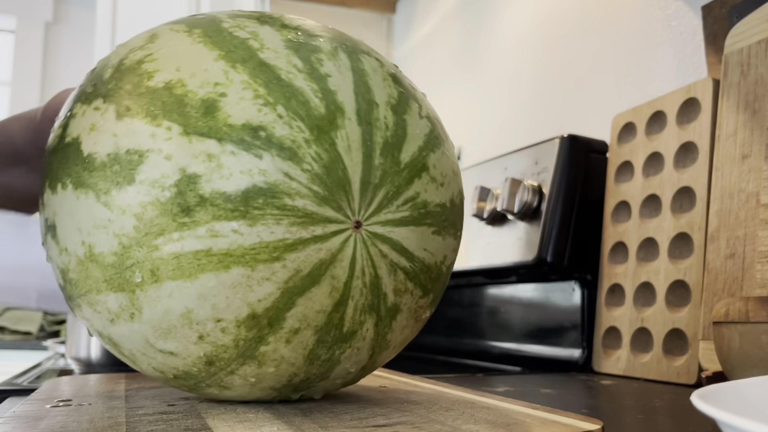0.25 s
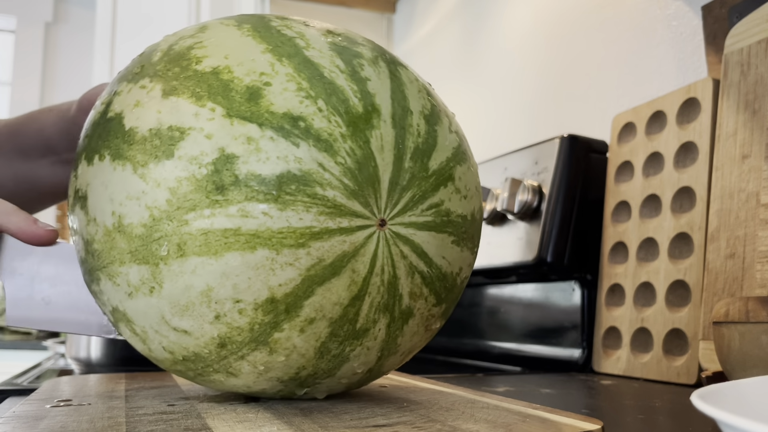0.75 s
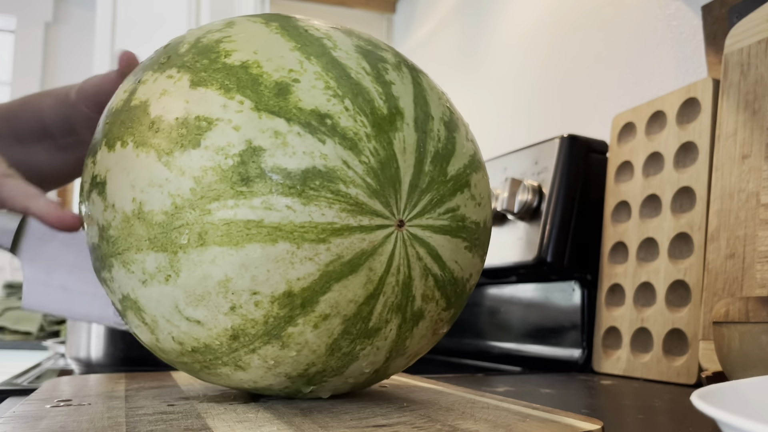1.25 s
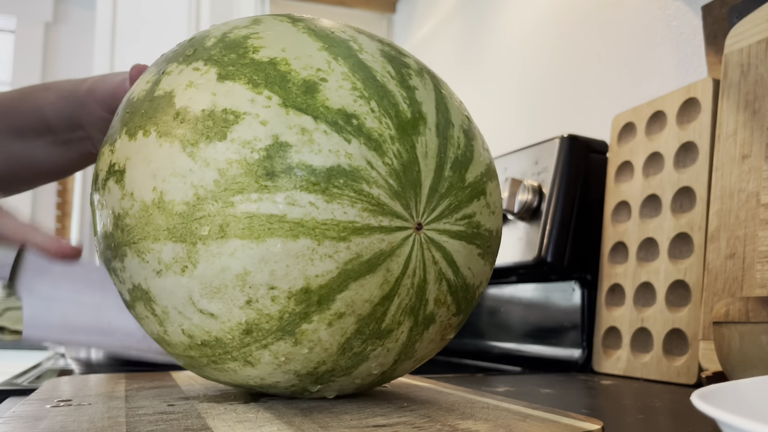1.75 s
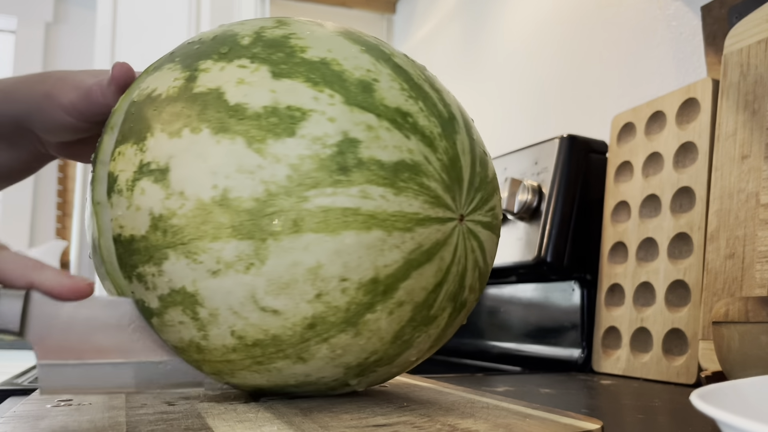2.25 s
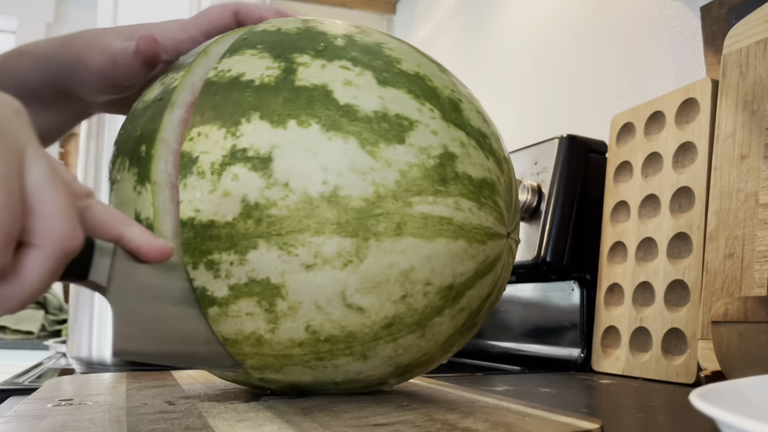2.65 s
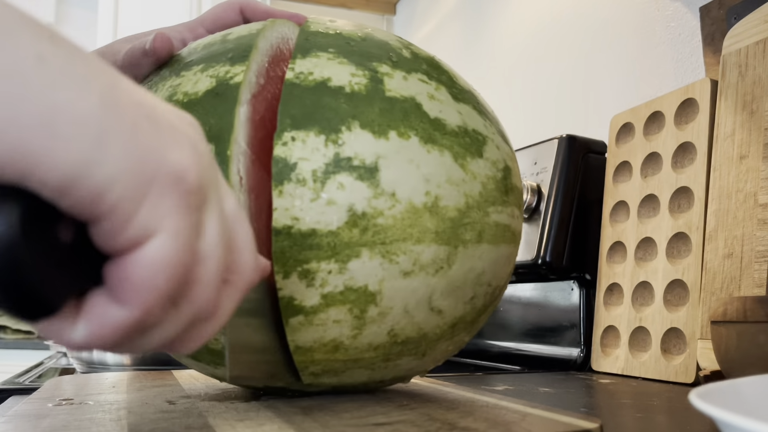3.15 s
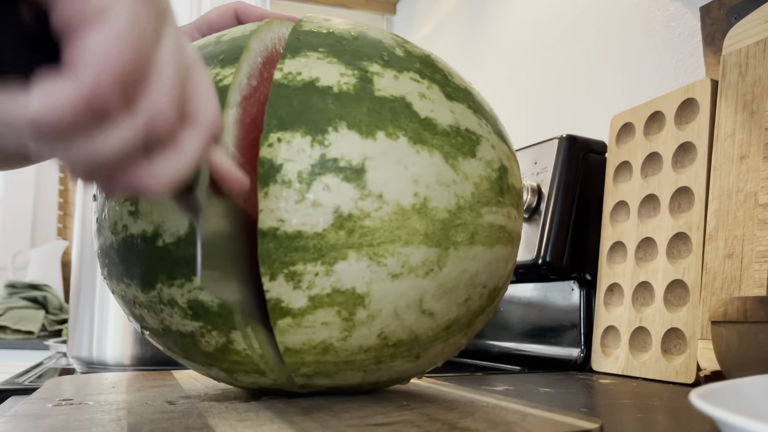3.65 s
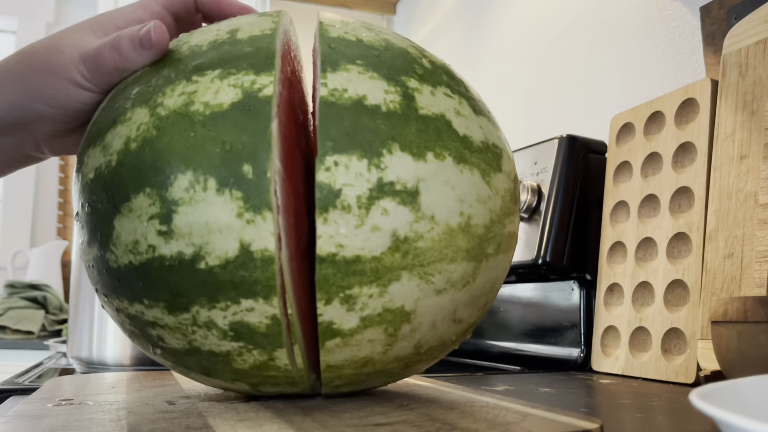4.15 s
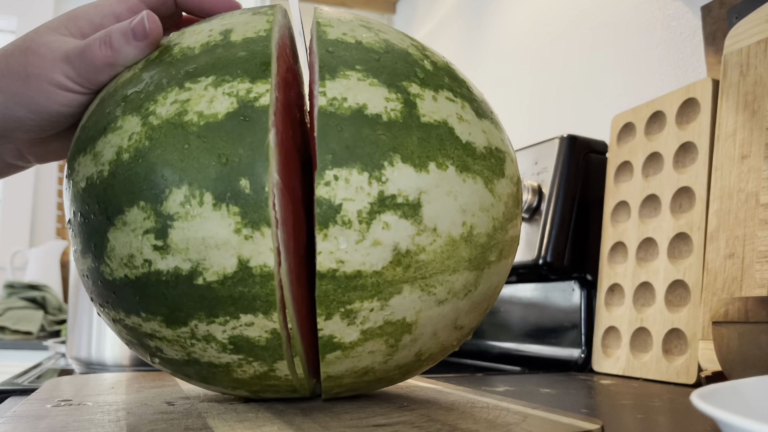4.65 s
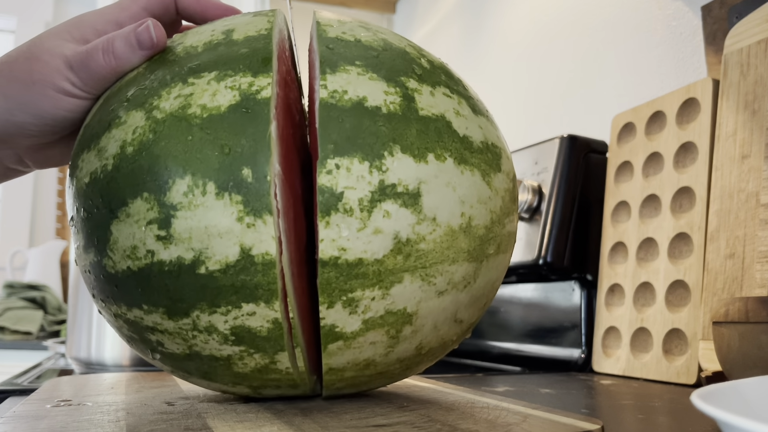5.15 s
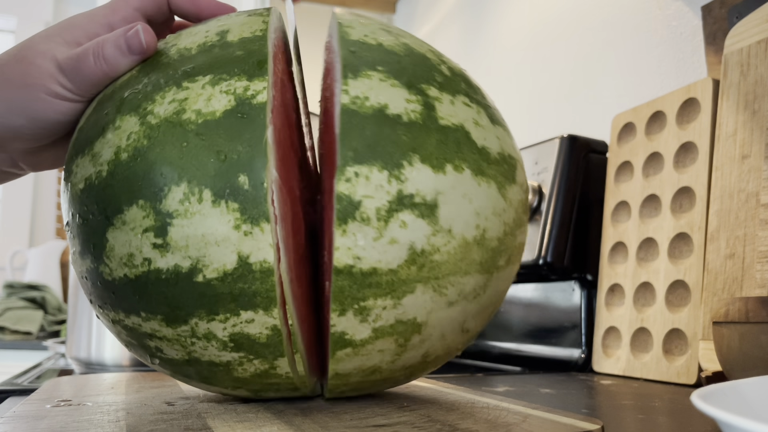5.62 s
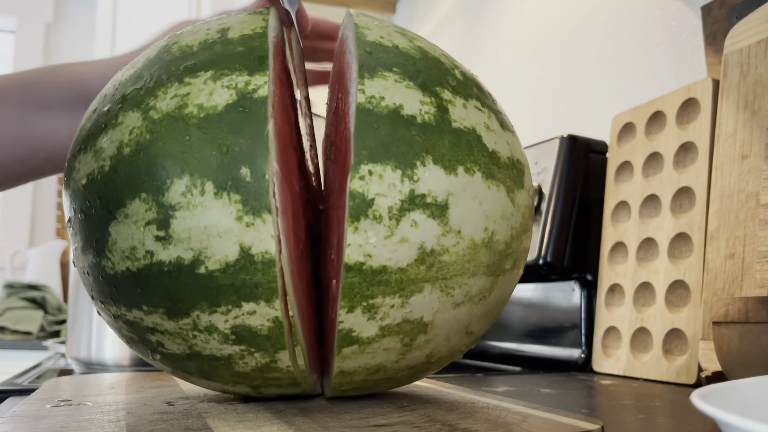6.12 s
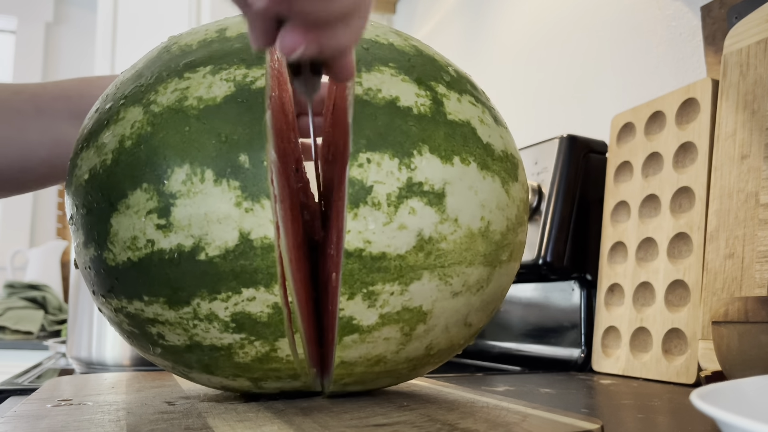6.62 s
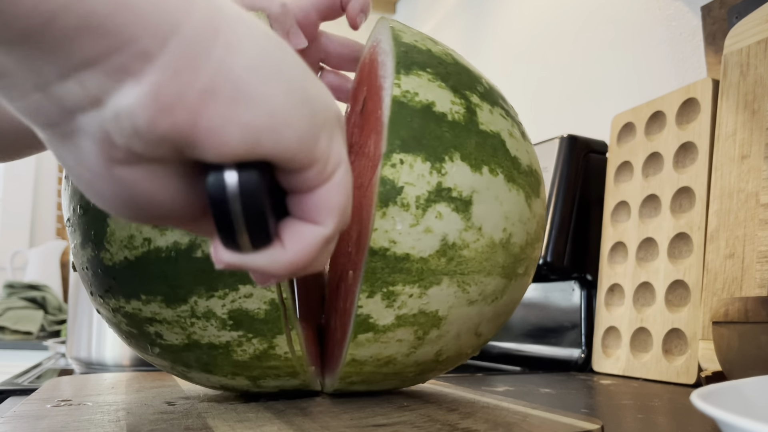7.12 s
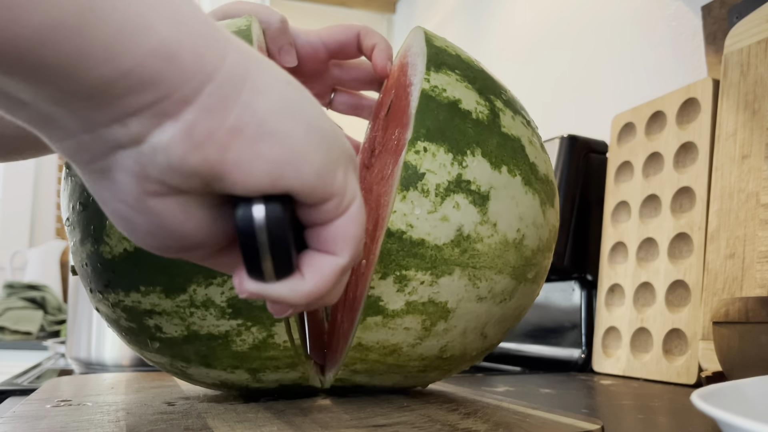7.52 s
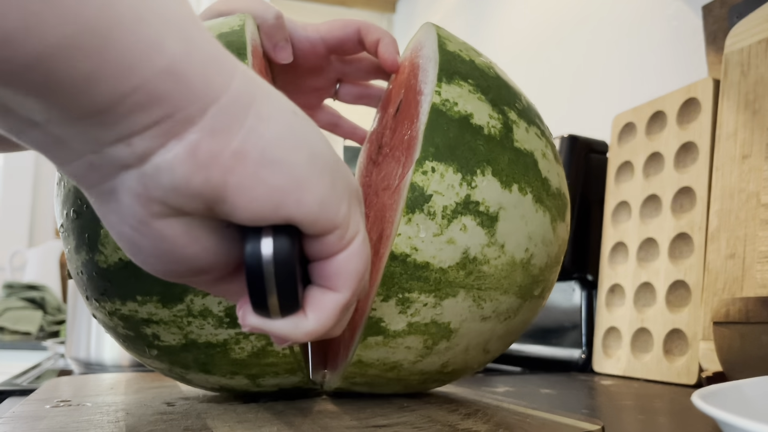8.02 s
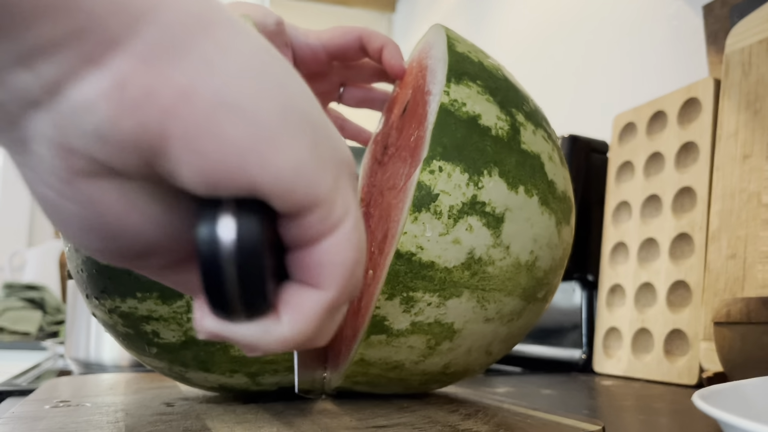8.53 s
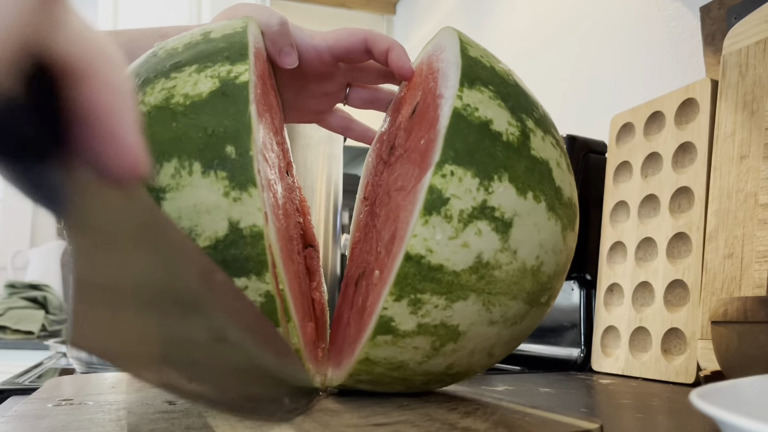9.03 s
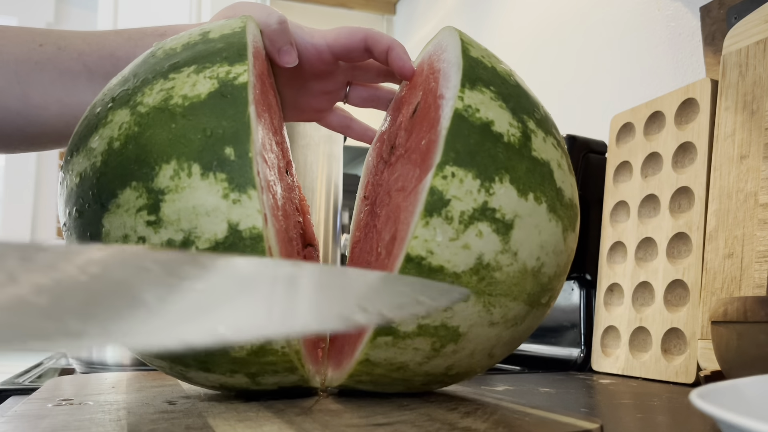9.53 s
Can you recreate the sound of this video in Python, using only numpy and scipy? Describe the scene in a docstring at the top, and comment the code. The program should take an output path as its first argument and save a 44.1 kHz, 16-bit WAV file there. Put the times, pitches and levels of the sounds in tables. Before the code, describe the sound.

Close up in a small kitchen, a big knife cuts a watermelon. A rapid cluster of sharp rind cracks and hollow booms opens it, with more loud cracks after a short lull. Quieter wet slicing, snaps and crackling tears follow, then one very hard knock on the wooden board, a rough squealing drag of the edge, and faint steel wipes over a low appliance hum.

```python
"""In a small kitchen, close to the microphone, a large knife splits a watermelon on a wooden board.
Fracture of the taut rind sends out sharp reports and sets shell and melon booming.
Random bursts of cells make the tearing flesh crackle and hiss along the blade; stick-slip makes it sing.
The edge strikes the board's modes and is drawn out over it in a rough squeal. An appliance hums behind."""
import sys
import numpy as np
from scipy import signal
from scipy.fft import rfft, irfft
from scipy.io import wavfile
from scipy.ndimage import uniform_filter1d, map_coordinates

SR = 44100
rng = np.random.default_rng(int(sys.argv[2]) if len(sys.argv) > 2 else 0)


def output_pcm(signal):
    """Save a mono or channel-first signal as 16-bit PCM at the path in sys.argv[1].

    Samples are clipped to [-1, 1] before scaling.
    """
    pcm = np.clip(np.atleast_2d(signal).T, -1, 1) * 32767
    wavfile.write(sys.argv[1], SR, np.round(pcm).astype(np.int16))


N = 431298
T = np.arange(N) / SR
FREQS = np.arange(N // 2 + 1) * SR / N
# Levels in the tables are in decibels; some of the functions that play them add gains of their own.


def undb(db):
    """Decibels to amplitude gain."""
    return 10 ** (np.asarray(db) / 20)


def unit(x):
    """Scale to rms 1."""
    return x / np.sqrt(np.mean(x ** 2))


def peak(x):
    """Scale to peak 1."""
    return x / np.abs(x).max()


def unit_energy(x):
    """Scale to a sum of squares of 1."""
    return x / np.sqrt(np.sum(x ** 2))


def add(track, s, sound):
    """Superposition: mix a sound in at time s."""
    i = max(int(s * SR), 0)
    track[i:i + len(sound)] += sound[:N - i]


def along(points, hz=FREQS, axis=1):
    """Interpolate a column of a table on a log-frequency axis."""
    rows = np.array(points, float)
    return np.interp(np.log(hz + 1), np.log(rows[:, 0]), rows[:, axis])


def response(points, size=1024):
    """Minimum phase: the causal impulse response of a spectrum, found by folding its cepstrum."""
    hz = np.arange(size // 2 + 1) * SR / size
    cepstrum = irfft(np.log(undb(along(points, hz))))
    cepstrum[1:size // 2] *= 2
    cepstrum[size // 2 + 1:] = 0
    return unit_energy(irfft(np.exp(rfft(cepstrum))))


def through(x, h):
    """Convolution: pass a sound through an impulse response."""
    return signal.fftconvolve(x, h)[:len(x)]


def smooth_noise(width, size=N):
    """Random fluctuation averaged over a width in samples, rms 1."""
    return unit(uniform_filter1d(rng.standard_normal(size), size=width))


def wander(seconds, size=N):
    """Random drift: noise averaged twice over the given time, rms 1."""
    width = int(seconds * SR)
    return unit(uniform_filter1d(smooth_noise(width, size), size=width))


def ring(modes, detune=0., size=32768):
    """Modal superposition: damped sines of alternating sign, with an optional random spread of pitch."""
    t, out = T[:size], 0
    for k, (hz, db, t60) in enumerate(modes):
        pitch = hz * (1 + detune * rng.standard_normal())
        out = out + (-1) ** k * undb(db - 60 * t / t60) * np.sin(2 * np.pi * pitch * t)
    return out


def push(seconds):
    """Contact force: a raised-cosine pulse, duller the longer it lasts."""
    return np.sin(np.pi * np.minimum(T[:SR // 20] / seconds, 1)) ** 2


def grains(rate, spread_db, size=N):
    """Random point process of bursting cells: many small clicks and a few large ones, rms 1."""
    sizes = undb(spread_db * np.minimum(rng.exponential(size=size), 5))
    return unit((rng.random(size) < rate / SR) * sizes * rng.standard_normal(size))


def fracture(run_s, crumble_db, crumble_s, lead_s=0.0011, lead_db=-14, size=2048):
    """Brittle fracture: first fibres give, a crack runs through the cells and crumbles on; unit energy."""
    t = T[:size] - lead_s
    after = np.maximum(t, 0)
    running = np.exp(-after / run_s) + undb(crumble_db) * np.exp(-after / crumble_s)
    force = np.where(t < 0, undb(lead_db), running)
    burst = grains(30000, 3.2, size=size) * force
    return np.pad(unit_energy(burst), (0, size))


# cracks of the rind: start_s, level_db, hollowness_db (middle band over treble), flap pitch_hz, run_s
CRACKS = [(0.069, -21.5, 4.5, 3000, 0.0005), (0.076, -26.5, 8.5, 990, .005), (0.081, -24, -2, 3120, 0.0018),
          (0.1014, -22, 1, 3330, 0.00078), (0.1383, -21.5, 0.5, 3020, 0.001),
          (0.1445, -17, -8, 4330, 0.0014), (0.149, -22, 1, 4200, .0006), (0.173, -17, -4, 3240, .0009),
          (0.1995, -21.5, -3, 4120, .0012), (0.2296, -22, -5.5, 4200, 0.00075),
          (1.4976, -13.5, -3, 1097, 0.00044), (1.5456, -19.5, 1, 5160, 0.00053),
          (1.551, -18, 2, 3000, 0.00033), (1.5571, -20.5, -8, 5200, 0.00056),
          (2.005, -42.5, 9, 1090, .0012), (5.18, -34.5, -3, 1892, 0.0021), (5.2134, -30.5, 5, 1270, .001),
          (5.218, -28, -0.5, 2000, 0.0035), (5.278, -32.5, -4, 2500, 0.0014), (5.491, -41, 5.5, 1700, .003),
          (5.523, -38, 3.5, 1200, .002), (5.535, -43.5, 6, 1000, .002), (5.546, -45, 6, 1400, .002),
          (5.595, -35, -1.5, 9000, 0.0024), (6.753, -33, 2.5, 1600, .0008), (6.797, -34, 4.5, 1400, 0.001),
          (6.929, -29, 4.5, 1580, 0.002), (6.9892, -33, 4.5, 2100, .001), (7.001, -39.5, 5, 2000, 0.0025),
          (7.049, -35.5, -3, 6360, 0.0011), (7.076, -29, -7, 8260, 0.00091), (7.083, -34.5, 2, 6000, .0012),
          (7.116, -29, -3, 5000, 0.0035), (7.1688, -26.5, -1, 4900, 0.00046)]
# small wet snaps of fibres: start_s, level_db
SNAPS = [(0.511, -33), (0.627, -21.5), (0.6928, -22.5), (1.084, -33), (1.461, -37), (1.523, -14.5),
         (1.9362, -15), (2.098, -30), (2.2363, -43.5), (2.382, -47), (2.542, -36), (2.566, -44.5),
         (2.6555, -41), (3.1994, -44.5), (3.592, -37), (3.6784, -26), (4.144, -47.5), (4.265, -44.5),
         (4.28, -45), (4.9427, -50.5), (5.03, -35), (5.121, -42.5), (5.447, -25.5), (5.466, -23),
         (7.366, -23.5), (7.583, -33.5), (8.335, -38.5), (9.38, -49.5), (9.64, -54.5)]
# middle and treble spectra of a crack: frequency_hz, level_db
CRACK_MID = [(200, -13.5), (400, -15), (900, -5.5), (1600, -8), (2500, -4.5), (4000, -22.5), (8000, -43.5)]
CRACK_TOP = [(1200, -35), (2500, -4.5), (3800, -4.5), (5400, -5), (6800, -7), (8500, -3), (11500, -4),
             (14000, -20.5)]
# modes of the whole melon: frequency_hz, level_db, t60_s
MELON_MODES = [(57.84, -13.5, 0.51), (71, -12, 0.34), (88, -5.5, .22), (108, -1, 0.15), (126.3, 8.5, 0.096),
               (132.6, 3.5, 0.16), (182, 0, 0.1), (280, -1.5, 0.039), (306, -1.5, 0.093),
               (395.5, -6.5, 0.17), (613, -10.5, 0.048)]


def rind(mid_db=22, top_db=25, boom_db=-10, snap_db=7, flap_db=8):
    """Impulsive excitation: a crack sounds through its freed flap and kicks the melon; fibres only tick."""
    out, mid, top = np.zeros(N), response(CRACK_MID), response(CRACK_TOP)
    for s, db, hollow_db, hz, run in CRACKS:
        burst = fracture(run_s=run, crumble_db=-15, crumble_s=.005)
        colour = undb(hollow_db + mid_db) * mid + undb(top_db) * top
        flap_peak = response([(hz / 1.5, 0), (hz, flap_db), (hz * 1.5, 0)])
        report = unit(through(burst, through(colour, flap_peak)))
        # the level follows the colour's energy, whatever the flap
        add(out, s, undb(db) * report * np.sqrt(np.sum(colour ** 2) / len(burst)))
        add(out, s, undb(db + boom_db) * peak(ring(MELON_MODES, detune=0.035)))
    for s, db in SNAPS:
        burst = fracture(run_s=.0008, crumble_db=-15, crumble_s=.006)
        add(out, s, undb(db + snap_db) * through(burst, top + 0.18 * mid))
    return out


# blows to the shell: start_s, level_db, first_pitch_hz, settled_pitch_hz, swell_s, melon ring level_db
THUDS = [(0.0695, -20, 2000, 235, 0.0089, -30.5), (0.101, -26.5, 1190, 175, 0.0089, -29),
         (0.1387, -18, 700, 195, 0.01, -31), (0.175, -30.5, 1294, 141, 0.0039, -26),
         (1.4989, -17, 1507, 164, 0.0057, -22.5), (1.546, -27.5, 1410, 151.3, 0.011, -35),
         (2.0056, -21.5, 1608, 98.5, 0.013, -30.5), (2.022, -27.5, 299.5, 115.4, 0.0067, -28),
         (3.29, -23, 695.5, 108.7, 0.019, -27.5), (4.656, -45, 893, 220, 0.0063, -57),
         (5.2133, -23, 1494, 214, 0.0045, -37), (5.491, -40, 1530, 334, 0.0045, -44),
         (5.521, -32.5, 1650, 336, 0.0073, -38), (5.544, -34.5, 1290, 232, 0.0029, -41),
         (5.594, -42, 1180, 108, 0.011, -40.5), (6.7524, -37, 1710, 79, 0.0033, -36),
         (6.7972, -37, 1840, 84, 0.0051, -32.5), (6.9306, -34.5, 1560, 102, 0.0014, -33.5),
         (6.99, -40, 1470, 100, 0.0034, -32.5), (7.086, -43, 1470, 124, 0.0044, -37),
         (7.117, -40, 1760, 107, 0.012, -41), (7.759, -45, 880, 99, 0.0088, -40),
         (8.022, -28.5, 1200, 134, 0.0083, -29.5)]
SWEEP_S, BOOM_T60_S = 0.0026, 0.32


def booming(contact_s=.007, upper_db=-5, upper_ratio=2.7, upper_t60_s=0.038):
    """Dispersion: high bending waves arrive first, so a blow chirps down to a boom over the melon's ring."""
    out, t = np.zeros(N), T[:16384]
    for s, db, first_hz, settled_hz, swell, body_db in THUDS:
        hz = settled_hz + (first_hz - settled_hz) / (1 + t / SWEEP_S) ** 2
        phase = 2 * np.pi * np.cumsum(hz) / SR
        envelope = peak(t / (swell ** 2 + t ** 2) * undb(-60 * t / BOOM_T60_S))
        # a brief higher wave, roughened by random phase
        rough_phase = upper_ratio * phase + wander(0.0007, size=len(t))
        upper = undb(upper_db - 60 * t / upper_t60_s) * np.sin(rough_phase)
        add(out, s, undb(db) * envelope * (np.sin(phase) + upper))
        body = through(ring(MELON_MODES, detune=0.02), push(contact_s))
        add(out, s, undb(body_db) * peak(body))
    return out


# runs of tearing flesh: height_s (time of the maximum), level_db, fade_s, brightness_db
TEARS = [(0.079, -16.5, 0.0059, -2), (0.147, -21.5, 0.0086, 0.5), (.19, -35, 0.076, 5),
         (1.099, -42.5, 0.014, 2.5), (1.502, -27, 0.014, -1), (1.559, -33.5, 0.0084, -8),
         (1.955, -37, 0.033, -2.5), (2.029, -37, 0.0048, -9), (2.555, -58, 0.019, 6.5),
         (3.28, -50.5, 0.011, 3.5), (3.695, -49, 0.053, 5), (4.667, -44, 0.018, 14.5),
         (4.945, -44, 0.0086, 6.5), (5.229, -32, 0.042, 7.5), (5.494, -35, 0.034, 3),
         (5.527, -32, 0.033, 7.5), (5.562, -45, 0.015, 8), (5.595, -30, 0.01, 8), (6.69, -40.5, 0.068, 3.5),
         (7.02, -38, 0.082, 4.5), (7.127, -27, 0.012, -2), (7.386, -34, 0.035, -1.5),
         (7.756, -33, 0.023, -2), (8.798, -35, 0.011, 6.5)]
# middle and treble spectra of bursting flesh: frequency_hz, level_db
FLESH_MID = [(150, -25.5), (400, -3), (1100, -1), (2000, -1.5), (3200, -3), (5000, -11.5), (9000, -57.5)]
FLESH_TOP = [(1500, -37.5), (3500, -10.5), (5200, -3), (7000, -1), (8800, 5), (11400, 8.5), (12600, -14.5),
             (14000, -21)]
TEAR_SWELL = 0.61  # a tear builds up in this share of its fading time


def tearing(mid_db=-4, top_db=-2, body_db=-9, lumpy_db=1.5):
    """Crackling noise: the split widens in spurts of dense bursts that also shake the melon's modes."""
    mid_gain, top_gain = np.zeros(N), np.zeros(N)
    for s, db, fade, bright_db in TEARS:
        distance = np.maximum((s - T) / (TEAR_SWELL * fade), (T - s) / fade)
        spurt = np.exp(-np.minimum(distance, 20))
        mid_gain += spurt * undb(db - bright_db + mid_db)
        top_gain += spurt * undb(db + top_db)
    lumps = undb(lumpy_db * smooth_noise(300))
    cells = unit(grains(3200, 1.5) * lumps)
    shake = undb(body_db) * through(cells * mid_gain, unit_energy(ring(MELON_MODES)))
    flesh_mid = through(cells * mid_gain, response(FLESH_MID))
    flesh_top = through(cells * top_gain, response(FLESH_TOP))
    return flesh_mid + flesh_top + shake


STROKE_ATTACK_S, STROKE_RELEASE_S = .022, .02


def stroke(s, length, growth_db=0, release=STROKE_RELEASE_S):
    """Force envelope of a hand movement: a quick start, a hold that grows or eases, a release."""
    progress = np.clip((T - s) / length, 0, 1)
    outside = np.maximum((s - T) / STROKE_ATTACK_S, (T - s - length) / release)
    return undb(growth_db * (progress - .5)) * np.exp(-np.clip(outside, 0, 20))


def rubbed(pressure, modes, rate):
    """Friction excitation: random grains ring a set of modes, as loud as the pressure."""
    return unit(through(grains(rate, 0.64), ring(modes))) * pressure


# time in which the edge is drawn out over the board: start_s, end_s
DRAW_OUT_S = (8.22, 9.06)
GLIDE_PER_S = .35  # fall of the log pitch
STEEL_SHARE, BARE_SHARE = .4, .9  # coloured share of the fizz, before and at the end of the draw


def blade_colour(x, count=23):
    """Modal coloration: uneven, drifting resonances that grow clearer and glide down as the blade is drawn."""
    start, end = DRAW_OUT_S
    free = np.clip(T - start, 0, end - start) * (T < end)
    modes = [(1000 + 680 * (k + .6 * rng.random()), 0, .03) for k in range(count)]
    steel = unit(through(grains(3000, 1.5), ring(modes, size=4096)))
    pitch = np.exp(.025 * wander(.2) + .007 * wander(.025) - GLIDE_PER_S * free)
    # reading the ringing at a varying speed shifts its resonances
    shifted = map_coordinates(steel, [np.cumsum(pitch)], order=3, mode="mirror")
    share = STEEL_SHARE + (BARE_SHARE - STEEL_SHARE) * np.sqrt(free / (end - start))
    return np.sqrt(1 - share) * x + np.sqrt(share * .6) * shifted


# strokes through the flesh: start_s, length_s, level_db, growth_db, wetness_db (middle band over hiss)
STROKES = [(.005, 0.043, -63.5, -11, -5.5), (0.338, 0.66, -59.5, 10, 1), (1.134, 0.075, -65.5, -2.5, 4.5),
           (1.419, 0.079, -64, 25, 4.5), (2.125, 0.15, -69.5, -2.5, -7.5), (3.446, 0.3, -57.5, 8, -2),
           (4.674, 0.23, -58.5, 1, -12.5), (5.115, 0.47, -55, 25.5, -6), (5.781, 0.41, -59, -1.5, -7.5),
           (6.284, 0.25, -61.5, -4.5, -7.5), (6.629, 0.24, -53.5, -16.5, -6.5), (7.24, 0.2, -58, -3, 0),
           (7.616, 0.16, -54.5, 26, -3), (8.283, 0.72, -58.5, 3, -2.5)]
# the bare blade wipes along the rind: start_s, length_s, level_db, growth_db
WIPES = [(3.883, 0.081, -66, -3.5), (4.499, 0.09, -63, -5.5), (8.619, 0.39, -60.5, 15),
         (8.803, 0.012, -55, 6), (9.355, 0.075, -66.5, 8), (9.682, 0.039, -67.5, 0)]
# modes of the steel blade: frequency_hz, level_db, t60_s
BLADE_MODES = [(605, 7, .14), (1166, 3, 0.07), (1745, -8, 0.049), (2240, -13, 0.1), (2719, -11, 0.12),
               (3560, -5, 0.09), (3844, -4, 0.08), (4204, -1, 0.2), (4479, -7, .1), (4800, -11, 0.12),
               (8140, 0, 0.103), (9730, 3.5, 0.027), (10690, 10, 0.05), (11450, 6, 0.1)]


def slicing(hiss_db=0, wet_db=-2, flicker_db=1.8, uneven_db=1.0, crackle_db=-6, steel_db=-4, tick_db=-5):
    """Friction noise: flesh rubs the flat blade in uneven fizz and lone ticks; the steel rings when bare."""
    hiss, wet, wipe = np.zeros(N), np.zeros(N), np.zeros(N)
    for s, length, db, growth_db, wetness_db in STROKES:
        effort = undb(db) * stroke(s, length, growth_db)
        hiss += effort * undb(hiss_db)
        wet += effort * undb(wetness_db + wet_db)
    for s, length, db, growth_db in WIPES:
        wipe += undb(db) * stroke(s, length, growth_db, release=0.01)
    cells = grains(12000, 0.66) * undb(flicker_db * smooth_noise(600))
    cells = cells + undb(crackle_db) * grains(360, 2.5)
    cells = blade_colour(cells) * undb(1.3 * wander(.03))
    fizz = through(cells * (hiss + wipe), response(FLESH_TOP))
    squelch = through(cells * wet * undb(uneven_db * wander(0.024)), response(FLESH_MID))
    ticks = through(grains(110, 1.6) * wet * undb(tick_db), response(CRACK_TOP))
    steel = rubbed(undb(steel_db) * wipe, BLADE_MODES[5:], rate=8000)
    return fizz + squelch + ticks + steel


# tones of the pinched or grazed blade: start_s, length_s, pitch_hz, level_db, growth_db
SINGS = [(2.06, .12, 1272, -66, -8), (4.721, 0.19, 3580, -71.5, 2.5), (4.812, 0.079, 4170, -79, -3),
         (5.139, 0.032, 3560, -81.5, -1), (5.428, .1, 3630, -54, 8), (6.44, 0.092, 3600, -80.5, -4),
         (8.985, 0.032, 11540, -51, -0.5), (9.36, 0.023, 4690, -85, 1), (9.379, 0.075, 4204, -79, -1.5),
         (9.686, .07, 4120, -82.5, -2)]


def singing():
    """Stick-slip holds one blade mode in a thin tone, blurred and broken by the wet contact."""
    out, drift = np.zeros(N), 1 + .013 * wander(.0012)
    flutter = unit(undb(4 * wander(.004)))
    for s, length, hz, db, growth_db in SINGS:
        tone = np.sin(2 * np.pi * np.cumsum(hz * drift) / SR)
        out += np.sqrt(2) * undb(db) * stroke(s, length, growth_db) * tone
    return out * flutter


# squeaks of the slipping wet rind: peak_s (sounding begins one length earlier), pitch_hz, level_db, length_s
SQUEAKS = [(2.029, 1230, -27, .0035), (5.518, 4550, -39, .002), (7.178, 4400, -41, .004),
           (8.604, 4880, -58, .006)]


def squeaks():
    """Stick-slip in brief chirps of unsteady pitch, each at its loudest one length after it begins."""
    out, t = np.zeros(N), T[:2048]
    for s, hz, db, length in SQUEAKS:
        wobble = .13 * smooth_noise(int(SR / hz), size=len(t))
        phase = 2 * np.pi * np.cumsum(hz * (1 + wobble)) / SR
        envelope = (t / length) ** 2 * np.exp(2 - 2 * t / length)
        add(out, s - length, np.sqrt(2) * undb(db) * envelope * np.sin(phase))
    return out


# the edge meets the board, at the last with a bounce: start_s, level_db, contact_s
KNOCKS = [(3.2888, -43.5, 0.0011), (8.0208, -1.5, 0.00032), (8.0279, -8, 0.0007)]
# light touches that ring the blade: start_s, level_db
TINGS = [(3.289, -46), (3.938, -41), (3.968, -43.5), (4.484, -51)]
# modes of the wooden board: frequency_hz, level_db, t60_s
BOARD_MODES = [(351, -13, .09), (425, -13, .08), (674, -6, .06), (720, -19, .3), (780, -20, .62),
               (932, -8, .035), (1008, -6, .05), (1109, -3, .035), (1238, -4, .04), (1406, -2, .02),
               (1525, -3, .025), (1785, 5.5, .022), (2017, -2, .03), (2363, -13, .035)]
# spectrum of the board's many close modes, fused into a woody bark: frequency_hz, level_db
BARK = [(59, -37.5), (100, -12), (380, -11), (522, -9), (668, -5.5), (1110, -0.5), (1750, -4.5),
        (2100, -13), (2700, -26.5), (5000, -40), (6500, -70.5), (11000, -120)]
BITE_S = 8.015  # the edge enters the last of the rind


def knife(bite_db=-25, grit_db=-3, clack_db=-23, bark_db=-1, ring_db=-5.0):
    """Impact excitation: the edge bites the last rind and knocks the board; gritty touches ring the steel."""
    out, mid, top = np.zeros(N), response(CRACK_MID), response(CRACK_TOP)
    for s, db, contact in KNOCKS:
        wood = through(ring(BOARD_MODES, detune=0.003), push(contact))
        add(out, s, undb(db + ring_db) * peak(wood))
        burst = rng.standard_normal(4096) * np.exp(-T[:4096] / 0.0042)
        add(out, s, undb(db + bark_db) * peak(through(burst, response(BARK))))
        clack = through(fracture(run_s=0.001, crumble_db=-9.5, crumble_s=0.028), mid + .15 * top)
        add(out, s, undb(db + clack_db) * peak(clack))
    bite = through(fracture(run_s=0.016, crumble_db=-17.5, crumble_s=0.019), top + mid)
    add(out, BITE_S, undb(bite_db) * peak(bite))
    for s, db in TINGS:
        touch = fracture(run_s=0.0048, crumble_db=-10, crumble_s=0.019)
        add(out, s, undb(db) * peak(through(ring(BLADE_MODES, detune=0.00076), touch)))
        add(out, s, undb(db + grit_db) * peak(through(touch, top)))
    return out


# pressure of the edge drawn over the board and lifted away: time_s, level_db
DRAG = [(8.25, -68), (8.33, -54.5), (8.46, -56), (8.59, -51), (8.68, -53), (8.76, -57), (8.83, -62),
        (8.99, -68), (9.05, -89)]
# resonances of the dragged edge: frequency_hz, level_db, t60_s
SCRAPE_MODES = [(696, -1.5, 0.022), (1130, -5, 0.076), (1270, -5.5, .03), (1616, 2, 0.028),
                (1712, -1.5, 0.06), (1893, 1, 0.042), (2470, -0.5, 0.0093), (3800, -11, .025),
                (4900, -17, .03), (5640, -21, .025)]


def dragging(sag_per_s=.04):
    """Sliding friction: a rough squeal whose resonances waver and sink with the point of contact."""
    pressure = undb(np.interp(T, *np.array(DRAG).T, left=-200, right=-200))
    catches = undb(.8 * wander(.004))
    sag = sag_per_s * (np.clip(T, *DRAW_OUT_S) - np.mean(DRAW_OUT_S))
    pitch = 1 + .01 * wander(.05) - sag
    squeal = rubbed(0.91, SCRAPE_MODES, rate=5000)
    return pressure * catches * map_coordinates(squeal, [np.cumsum(pitch)], order=3, mode="mirror")


# the steadying hand slides over the rind: start_s, length_s, level_db, growth_db
SLIDES = [(2.266, 0.18, -72.5, 3), (2.73, 0.24, -71, 0.5), (3.05, 0.22, -76, -2.5)]
# spectrum of skin on rind: frequency_hz, level_db
SKIN = [(500, -20), (1300, -3.5), (2300, -1), (3900, -6), (5000, -16), (9000, -13)]


def handling(uneven_db=2.0):
    """Soft friction: skin slides over the waxy rind in uneven swells."""
    pressure = np.zeros(N)
    for s, length, db, growth_db in SLIDES:
        pressure += undb(db) * stroke(s, length, growth_db, release=0.025)
    return through(grains(5000, 1.1) * pressure * undb(uneven_db * wander(0.028)), response(SKIN))


# reverberation of the kitchen: frequency_hz, t60_s, level_db
ROOM = [(60.07, 0.18, -1), (197.7, 0.27, -8), (800, 0.28, -9.5), (2000, 0.47, -12), (5000, 0.45, -12),
        (12000, 0.28, -11.5)]


def kitchen(x, size=32768):
    """Diffuse reverberation from tiles and cupboards; the ports differ most in the middle band."""
    t, hz = T[:size], np.arange(size // 2 + 1) * SR / size
    noise, tail = rfft(rng.standard_normal((2, size))), 0
    # side over mid: frequency_hz, gain ratio
    noise[1] *= along([(70, .06), (200, .8), (500, 1.4), (1500, 1.3), (6000, 1.1), (9000, .45)], hz)
    for k, (_, t60, db) in enumerate(ROOM):
        share = along([(row[0], j == k) for j, row in enumerate(ROOM)], hz)  # overlapping bands
        decay = undb(-60 * t / t60) * (1 - np.exp(-t / 0.0021))
        tail = tail + irfft(noise * share) * undb(db - 2) * unit_energy(decay)
    mid, side = (through(x, h) for h in tail)
    return np.array([mid + side, mid - side])


# spectrum of the room air: frequency_hz, level_db
AIR = [(21, -41.5), (35, -9), (118, -7.5), (196, -13), (280, -6), (431, -16.5), (1020, -30.5), (1380, -37),
       (1650, -38), (8810, -49.5), (10300, -55), (11300, -42), (15000, -73.5)]
AIR_DB = -61
# appliance hum: frequency_hz, level_db
HUM = [(59.2, -68), (119, -67), (279.8, -59), (313, -82), (839.8, -84.5)]


def slow_noise():
    """Low-passed random fluctuation of a few hertz, rms 1."""
    return unit(irfft(rfft(rng.standard_normal(N)) * np.exp(-FREQS / 4), N))


def background(waver=0.26, hum_pan_db=2.0):
    """Steady-state noise: a slightly wavering appliance hum over air whose bass is alike at both ports."""
    widths = (1, np.minimum(FREQS / 800, .8))  # of mid and side
    mid, side = (irfft(rfft(rng.standard_normal(N)) * undb(along(AIR)) * w, N) for w in widths)
    air = (mid + side * np.array([[1], [-1]])) * undb(AIR_DB) / mid.std()
    hum = np.zeros(N)
    for hz, db in HUM:
        swell, drift = slow_noise(), slow_noise()
        tone = np.sin(2 * np.pi * hz * T + waver * drift)
        hum += np.sqrt(2) * undb(db) * (1 + waver * swell) * tone
    return air + hum * undb(np.array([[hum_pan_db], [-hum_pan_db]]) / 2)


# everything except the background, as the two microphone ports hear it: frequency_hz, left minus right level_db
PORT_DB = [(60, -2), (200, 0.5), (600, -2.5), (1300, 4), (2400, 4), (5000, 4.5), (6400, 4.5), (7100, 3),
           (8100, 1), (12000, 0.5)]
# the same for phase: frequency_hz, left lead_rad
PORT_PHASE = [(30, 0), (600, 0), (900, .8), (1500, -.7), (2100, .5), (3000, 1.1), (4000, .4), (6800, .1),
              (7700, .8), (8600, 0), (10250, -3.14), (11900, -6.3), (12600, -6.7), (13400, -9.3),
              (14200, -9.5), (15000, -12.6)]


def scene(board_room_db=2):
    """Level and phase differences between ports place the cutting; the board sends more into the room."""
    melon = rind() + booming() + tearing() + slicing() + singing() + squeaks() + handling()
    board = knife() + dragging()
    heard = melon + board + kitchen(melon + undb(board_room_db) * board)
    # half of each difference goes to the left port, the inverse to the right
    lean = undb(along(PORT_DB) / 2) * np.exp(.5j * along(PORT_PHASE))
    return irfft(rfft(heard) * np.array([lean, 1 / lean]), N) + background()


TOP_HZ = 16000


def record(dry, shelf_hz=12500, shelf_db=-12, low_hz=43, ceiling=0.51):
    """Band limits and saturation: the microphone loses deep bass and top treble and rounds loud peaks."""
    shelf = undb(shelf_db * (1 + np.tanh((FREQS - shelf_hz) / 800)) / 2)
    rounded = ceiling * np.tanh(dry / ceiling)
    high_pass = signal.butter(6, low_hz, "high", fs=SR, output="sos")
    sound = irfft(rfft(signal.sosfilt(high_pass, rounded)) * shelf, N)
    low_pass = signal.ellip(8, .2, 70, TOP_HZ, fs=SR, output="sos")
    return signal.sosfilt(low_pass, sound)


dry = scene()
out = record(dry)
output_pcm(out)
```